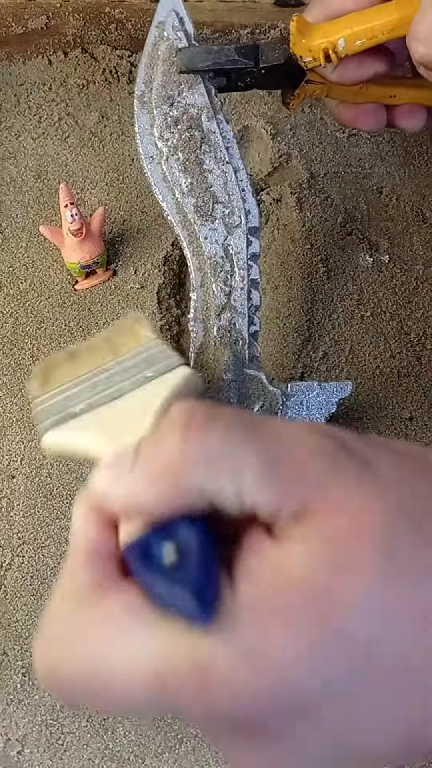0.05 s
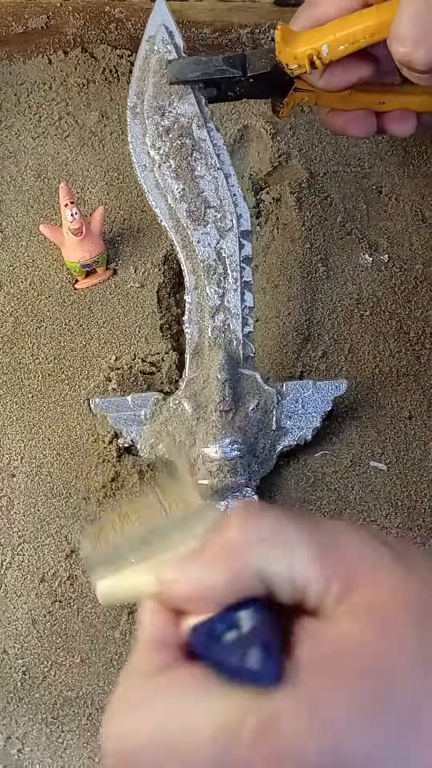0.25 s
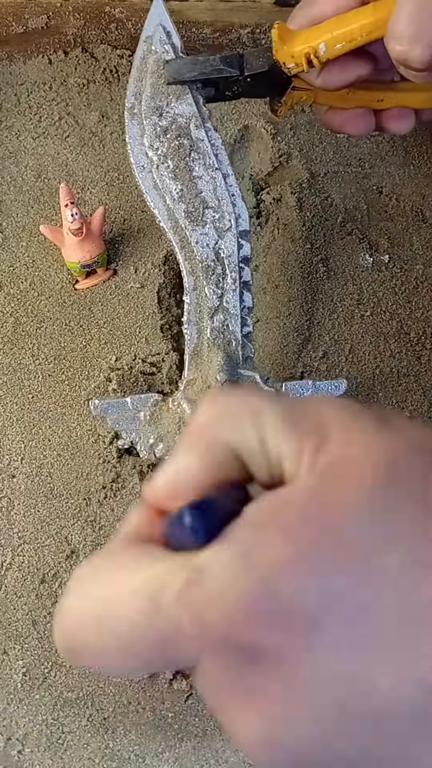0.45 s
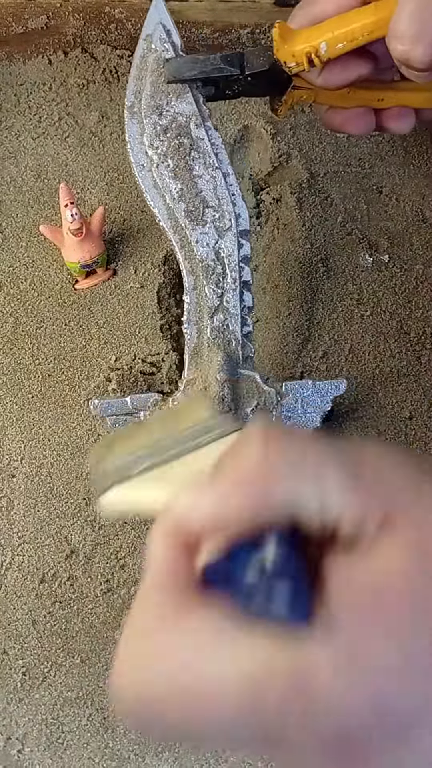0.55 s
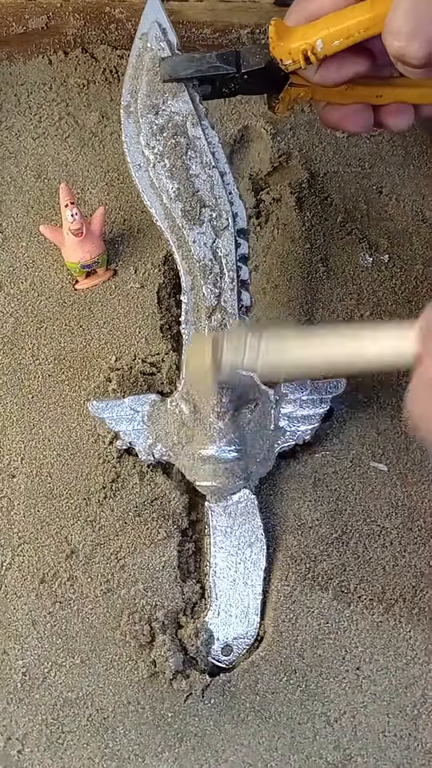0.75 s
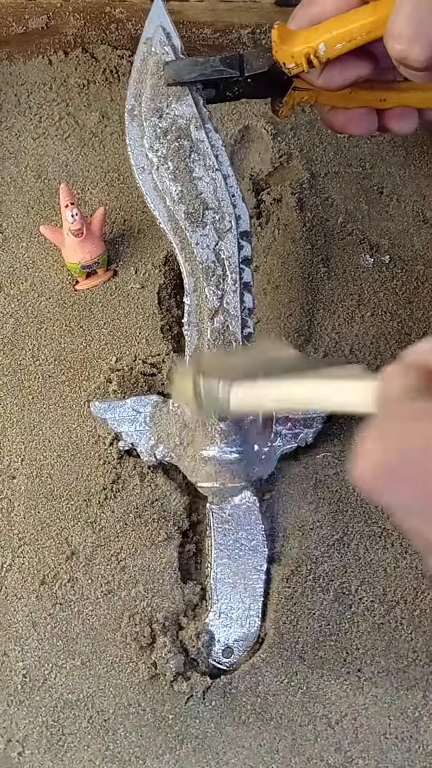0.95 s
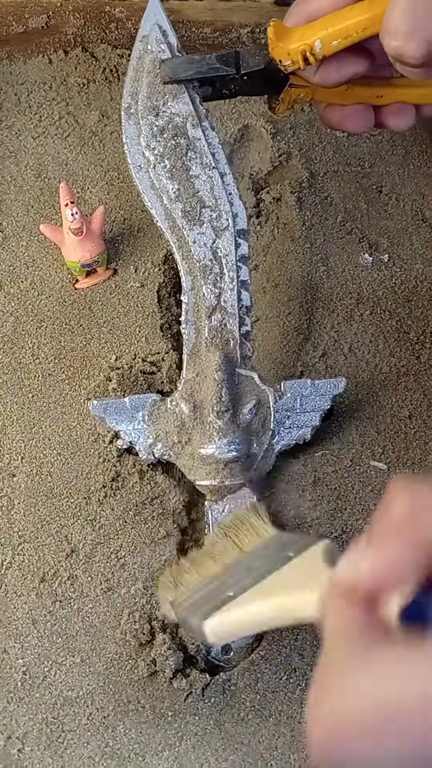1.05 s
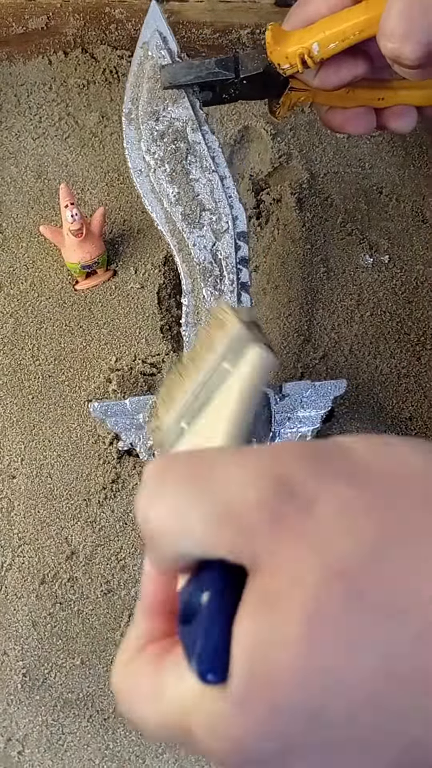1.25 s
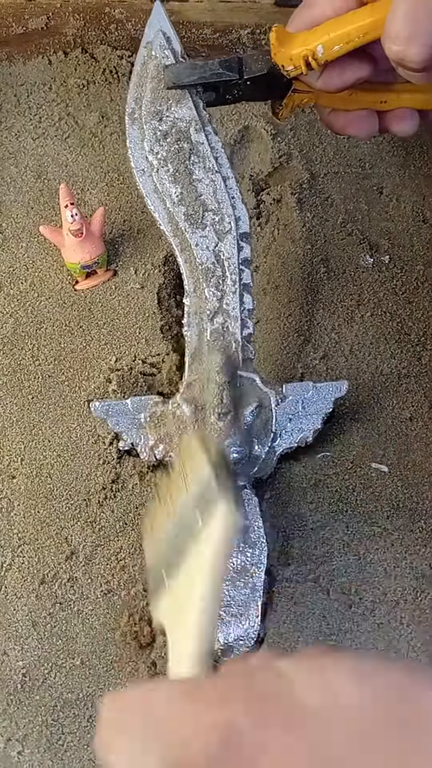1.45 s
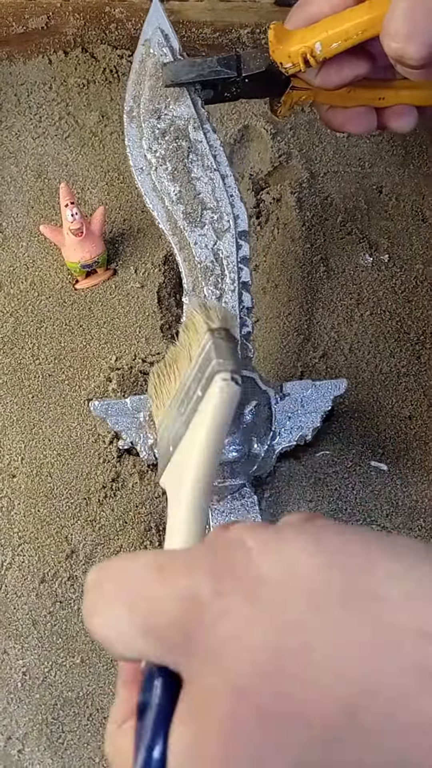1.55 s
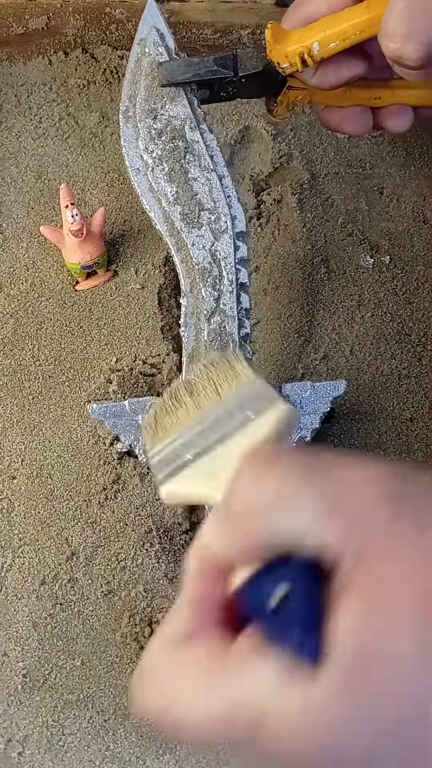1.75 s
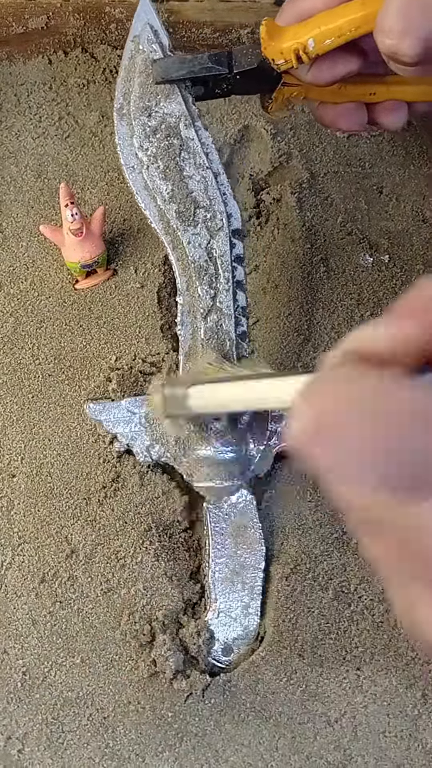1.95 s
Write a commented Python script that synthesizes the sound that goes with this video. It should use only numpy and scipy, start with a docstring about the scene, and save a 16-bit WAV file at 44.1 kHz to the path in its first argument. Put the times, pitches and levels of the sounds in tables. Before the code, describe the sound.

Quick, raspy brush strokes over sandy metal, twice knocking against it with a small clink.

```python
"""A paintbrush flicks sand off a cast metal sword lying in a bed of sand, close to one microphone.
The bristle tips touch with small chirps, then each stroke swells into a gritty rasp that deepens
as the bristles bend, and the bed thumps and shudders beneath. Twice the brush knocks on the metal
and ringing tones linger briefly. The place is a small, quiet room with a short tail."""
import sys
import numpy as np
from scipy import signal
from scipy.fft import rfft, irfft
from scipy.io import wavfile
from scipy.ndimage import uniform_filter1d

SR = 44100
rng = np.random.default_rng(int(sys.argv[2]) if len(sys.argv) > 2 else 0)


def generate_wav(signal):
    """Clip the signal to [-1, 1] and save it as 16-bit WAV at the path in sys.argv[1]."""
    frames = np.transpose(np.atleast_2d(signal))
    scaled = np.clip(frames, -1, 1) * 32767
    pcm = np.round(scaled).astype(np.int16)
    wavfile.write(sys.argv[1], SR, pcm)


N = 88200
TIME = np.arange(N) / SR

# ringing tones that linger after the knocks and faintly colour the brushing: pitch_hz, level_db, t60_s
LINGERING_TONES = [(281, -8, .16), (441, -4, .12), (938, 1, .09), (1091, 1, .11), (1303, -8, .09),
                   (1451, -6, .09), (1835, -1, .09), (1946, 1, .1), (2098, -3, .11), (2200, -4, .11),
                   (2340, 3, .09), (2543, 2, .11), (2719, 0, .11), (2860, 1, .09), (3435, -9, .08)]


def amp(db):
    """Decibels to gain."""
    return 10 ** (np.asarray(db) / 20)


def unit(x):
    """Scales to rms 1."""
    return x / np.sqrt(np.mean(x ** 2) + 1e-20)


def curve_at(points, hz):
    """Interpolates (freq_hz, value) points on a log-frequency axis."""
    freq_hz, value = np.transpose(points)
    return np.interp(np.log(hz + 1), np.log(freq_hz), value)


def colour(x, spectrum):
    """Filters x by (freq_hz, level_db) points, at rms 1."""
    gain = amp(curve_at(spectrum, np.fft.rfftfreq(N, 1 / SR)))
    return unit(irfft(rfft(x) * gain, N))


def add(mix, start_s, sound):
    """Mixes a sound in at start_s."""
    part = mix[max(round(start_s * SR), 0):][:len(sound)]
    part += sound[:len(part)]


def resonate(x, hz, width_hz):
    """A steep resonance that follows hz, at rms 1."""
    carrier = np.exp(2j * np.pi * np.cumsum(hz * np.ones(len(x))) / SR)
    pole = np.exp(-np.pi * width_hz / SR)
    baseband = signal.lfilter([1 - pole], [1, -2 * pole, pole * pole], x / carrier)
    return unit((carrier * baseband).real)


def ring(modes, t):
    """A sum of dying sines."""
    return sum(amp(db) * 1000 ** (-t / t60_s) * np.sin(2 * np.pi * hz * t) for hz, db, t60_s in modes)


def grit(grains_per_s=2200, spread_db=3, click_share=0.6):
    """Dense grain clicks of uneven size over smooth friction noise."""
    sizes = amp(spread_db * np.minimum(rng.exponential(1, N), 4))
    clicks = sizes * rng.choice([-1, 1], N) * (rng.random(N) < grains_per_s / SR)
    return np.sqrt(click_share) * unit(clicks) + np.sqrt(1 - click_share) * rng.standard_normal(N)


def room_tone(level_db=-92.5):
    """The faint, mostly low air of a quiet room."""
    # spectrum of the air: freq_hz, level_db
    spectrum = [(25, 5.5), (120, 17), (300, 5), (1000, -14.5), (2500, -24), (5000, -12.5), (10000, -40),
                (16000, -17.5)]
    return amp(level_db) * colour(rng.standard_normal(N), spectrum)


def room_tail(x, delay_s=0.008):
    """The small room answers with a diffuse tail, each band dying at its own speed."""
    # decay of the room: freq_hz, t60_s
    decay = [(150, 0.17), (1000, 0.19), (2500, 0.19), (5000, 0.15), (12000, 0.058)]
    hz, t, bands = signal.stft(rng.standard_normal(SR // 2), SR, nperseg=256)
    fade = amp(-60 * t / curve_at(decay, hz)[:, None])
    tail = signal.istft(bands * fade, SR, nperseg=256)[1]
    out = np.zeros(N)
    add(out, delay_s, signal.fftconvolve(x, tail / np.linalg.norm(tail)))
    return out


def near_echoes(x, count=8, span_s=0.022, level_db=-11):
    """The bench and the box walls throw a few early reflections back to the microphone."""
    out = np.zeros(N)
    for distance, polarity in rng.random((count, 2)):
        add(out, span_s * (0.15 + distance), np.sign(polarity - 0.5) * x)
    return amp(level_db) * out / np.sqrt(count)


def bed_rumble(brush, lag_s=0.032, relative_db=-22.5):
    """The bed shudders under the brush and settles a little later."""
    # spectrum of the shudder: freq_hz, level_db
    spectrum = [(25, -25), (60, 0.5), (100, 4), (200, -6.5), (260, -14.5), (420, -7.5), (700, -35)]
    pole = np.exp(-1 / (lag_s * SR))
    brush_rms = np.sqrt(signal.lfilter([1 - pole], [1, -pole], brush ** 2))
    return amp(relative_db) * brush_rms * colour(rng.standard_normal(N), spectrum)


def bed_thumps(rise_s=0.016, t60_s=0.088):
    """Each push gives a soft low thud and sets the sand box ringing."""
    # pushes of the brush on the bed: start_s, level_db, pitch_hz
    pushes = [(0.046, -65, 149), (0.073, -59, 146), (0.171, -51.5, 139), (.203, -50, 165),
              (0.227, -46.5, 140), (.358, -54.5, 108), (0.411, -55.5, 135), (0.571, -50.5, 114),
              (.590, -63, 136), (0.641, -59, 146), (.752, -58.5, 93), (0.814, -53, 150),
              (0.993, -49.5, 145), (1.157, -61, 88), (1.171, -57, 137), (1.284, -59.5, 121),
              (1.332, -67.5, 150), (1.379, -70, 150), (1.587, -57.5, 127), (1.616, -61, 147),
              (1.719, -61, 146), (1.767, -61.5, 151), (1.830, -83, 136), (1.918, -59.5, 101),
              (1.982, -63, 135)]
    # modes of the sand box: pitch_hz, level_db, t60_s
    box_modes = [(146.1, -10.5, .26), (234.7, -22, 0.16), (280.8, -19, .16), (414.4, -24.5, 0.17)]
    out, t = np.zeros(N), np.arange(SR // 3) / SR
    onset = np.sin(np.pi / 2 * np.minimum(t / rise_s, 1)) ** 2
    for start_s, db, hz in pushes:
        thud = ring([(hz, 0, t60_s)], t)
        add(out, start_s, 2 * amp(db) * onset * (thud + ring(box_modes, t)))
    return out


def brush_ringing(brush, relative_db=-16):
    """Ringing tones faintly colour the brushing."""
    tones = ring(LINGERING_TONES, np.arange(SR // 3) / SR)
    return amp(relative_db) * brush.std() * unit(signal.fftconvolve(brush, tones)[:N])


def crackle(bursts, rise_s):
    """Crushed grains give short, bright bursts."""
    # spectrum of cracking grains: freq_hz, level_db
    spectrum = [(1500, -8), (3300, 11), (4500, -3.5), (5400, 2), (7000, -1), (8500, -7.5), (10500, -23),
                (14000, -27), (15500, -20.5)]
    envelope, t = np.zeros(N), np.arange(SR // 8) / SR
    for start_s, db, t60_s in bursts:
        add(envelope, start_s, amp(db - 60 * t / t60_s) * (1 - np.exp(-t / rise_s)))
    return envelope * colour(grit(), spectrum)


def bristle_ticks():
    """Single bristles and coarse grains tick."""
    # ticks: start_s, level_db, t60_s
    ticks = [(.040, -70.5, 0.069), (.168, -65.5, 0.057), (.732, -60.5, 0.068), (.763, -49, .025),
             (.864, -68.5, 0.034), (.923, -67, 0.14), (1.041, -78, 0.039), (1.083, -77, 0.075),
             (1.204, -61.5, .02), (1.509, -48, 0.021), (1.714, -56.5, 0.049), (1.919, -63.5, 0.065)]
    return crackle(ticks, rise_s=0.005)


def knocks(band_hz=(204, 3530), clink_rise_s=0.00078, tones_rise_s=0.003, crack_t60_s=0.019):
    """The brush hits the sword, grains crack, and tones linger after each clatter's hardest contact."""
    # the handle clatters on the sword: start_s, thock_db, clink_db, crack_db
    handle_hits = [(0.1993, -48.5, -31, -64), (0.2067, -22, -39, -47), (0.2082, -28.5, -21.5, -52.5),
                   (0.2131, -43.5, -21.5, -56.5)]
    # later the brush's metal band skips over the sandy guard: start_s, ring_db, crack_db
    band_skips = [(1.1582, -48, -48.5), (1.1611, -44.5, -45), (1.1629, -32.5, -45.5), (1.1642, -36, -44.5),
                  (1.1692, -48, -52)]
    # modes of the dull thock: pitch_hz, level_db, t60_s
    thock_modes = [(462, -5.5, 0.014), (1004, -6.5, 0.018), (1082, -4.5, 0.02), (1674, -7.5, 0.0065),
                   (1825, -2, 0.038)]
    # modes of the metal clink: pitch_hz, level_db, t60_s
    clink_modes = [(2070, -4, 0.017), (2416, 2.5, 0.013), (2586, -1, .012), (2703, -2.5, 0.01),
                   (3270, -6.5, 0.013)]
    # modes of the brush's metal band: pitch_hz, level_db, t60_s
    band_modes = [(656, -30, 0.022), (820, -15, 0.02), (900, -11.5, 0.031), (1452, -20, 0.043),
                  (1590, -18, 0.035), (1944, 1.5, 0.09), (2170, -22, 0.0087), (3425, -8, 0.044),
                  (4020, -13.5, 0.027)]
    body, t = np.zeros(N), np.arange(SR // 3) / SR
    clink = ring(clink_modes, t) * (1 - np.exp(-t / clink_rise_s))
    for start_s, thock_db, clink_db, _ in handle_hits:
        add(body, start_s, -amp(thock_db) * ring(thock_modes, t) - amp(clink_db) * clink)
    for start_s, ring_db, _ in band_skips:
        add(body, start_s, amp(ring_db) * ring(band_modes, t))
    tones = ring(LINGERING_TONES, t) * (1 - np.exp(-t / tones_rise_s))
    for contacts, tones_db in ((handle_hits, -43), (band_skips, -57)):
        hardest_s = max(contacts, key=lambda row: row[1])[0]
        add(body, hardest_s, amp(tones_db) * tones)
    cracks = [(start_s, crack_db, crack_t60_s) for start_s, *_, crack_db in handle_hits + band_skips]
    contact_band = signal.butter(3, band_hz, "bandpass", fs=SR, output="sos")
    return crackle(cracks, rise_s=0.0005) + signal.sosfilt(contact_band, body)


def tip_touches():
    """The bristle tips catch and slip together in short, narrow chirps."""
    # chirps on the metal, low grunts in the sand: centre_s, length_s, pitch_hz, width_hz, level_db
    chirps = [ (.050, 0.0067, 2580, 901, -92), (.092, 0.032, 382, 100.5, -75),
              (0.179, 0.017, 2400, 860, -61.5), (.362, 0.021, 2340, 700, -67.5),
              (.537, 0.0071, 2280, 700, -71), (0.646, 0.025, 2110, 250, -55),
              (0.676, 0.023, 1950, 396, -74.5), (0.741, 0.0097, 2540, 905, -53.5),
              (0.741, 0.0083, 433, 170, -59.5), (0.821, 0.021, 300, 109, -64),
              (.475, 0.013, 420, 120, -72.5), (.605, 0.038, 390, 130, -73.5),
              (0.934, 0.0092, 2350, 570, -52.5), (.957, 0.017, 2200, 800, -59),
              (1.14, 0.012, 2480, 596, -65), (1.264, 0.022, 650, 249, -61.5),
              (1.228, 0.023, 2120, 500, -63.5), (1.299, 0.041, 2360, 446, -59),
              (1.441, 0.019, 1900, 249, -69.5), (1.649, 0.0076, 1800, 408, -68.5),
              (1.718, 0.0049, 2630, 930, -50), (1.724, 0.0043, 2640, 695, -49.5),
              (1.716, 0.012, 533, 200, -71.5), (1.786, 0.013, 2700, 252, -55),
              (1.825, 0.0053, 2330, 905, -51), (1.873, 0.025, 2270, 690, -64.5),
              (1.926, 0.014, 2560, 646, -62.5)]
    # faint high whispers between strokes: centre_s, length_s, pitch_hz, width_hz, level_db
    whispers = [(.325, 0.086, 4430, 400, -80), (1.095, 0.046, 7100, 1500, -89),
                (1.672, 0.079, 4450, 400, -77.5)]
    out, t = np.zeros(N), np.arange(SR // 5) / SR
    middle_s = t.mean()
    for centre_s, length_s, hz, width_hz, db in chirps + whispers:
        swell = np.exp(-2 * ((t - middle_s) / length_s) ** 2)
        chirp = resonate(rng.standard_normal(len(t)), hz, width_hz) * swell
        add(out, centre_s - middle_s, amp(db) * unit(chirp) * np.sqrt(np.mean(swell ** 2)))
    return out


def grain_clumps(x, depth_db=2.9):
    """Clumps of grains lift and dip narrow bands for a moment."""
    bands = signal.stft(x, nperseg=512)[2]
    patches = uniform_filter1d(rng.standard_normal(bands.shape), size=4, axis=0)
    patches = uniform_filter1d(patches, size=4, axis=1)
    return signal.istft(bands * amp(depth_db * unit(patches)), nperseg=512)[1][:N]


def brush_strokes(ramp_db=27, ramp_curve=0.95, flutter_db=0.27):
    """Bristles drag grains over the metal, close up; the scrub sinks in pitch as they bend."""
    # strokes: full_pressure_s, rise_s, hold_s, fall_s, scrub_db, rasp_db, hiss_db
    strokes = [ (0.058, 0.02, 0.022, 0.049, -68.5, -66, -70.5),
               (.195, 0.0072, 0.016, 0.061, -48.5, -54, -54),
               (0.227, 0.017, 0.031, 0.032, -58.5, -56.5, -78.5),
               (0.393, 0.056, 0.035, 0.038, -62.5, -57.5, -63),
               (0.465, 0.021, 0.0083, 0.087, -71.5, -78, -83),
               (0.492, .008, 0.0044, 0.014, -86, -68.5, -71.5),
               (0.533, 0.013, 0.0038, 0.045, -72, -61.5, -69), (0.569, .03, 0.033, 0.057, -76, -64.5, -67),
               (0.628, 0.017, 0.028, 0.034, -64, -63, -61.5), (0.767, 0.033, 0.052, 0.042, -62, -58, -62.5),
               (.970, 0.032, 0.016, 0.024, -59, -54.5, -59.5), (0.998, .012, 0.007, .02, -59, -61, -64),
               (1.041, 0.0116, 0.012, 0.064, -68, -85, -79.5),
               (1.151, 0.059, 0.021, 0.026, -67.5, -66, -65.5),
               (1.185, .02, 0.037, 0.062, -87.5, -72, -68.5),
               (1.249, 0.032, 0.014, 0.049, -65, -58.5, -61.5),
               (1.283, 0.026, 0.054, 0.044, -82, -61.5, -60), (1.347, 0.02, 0.04, 0.038, -65, -59.5, -64),
               (1.439, 0.023, 0.0074, 0.024, -77.5, -82, -70),
               (1.486, 0.02, 0.027, .012, -83.5, -70, -69.5), (1.568, 0.034, 0.013, 0.1, -67.5, -57, -57.5),
               (1.59, .03, 0.015, 0.059, -60.5, -61, -73), (1.758, 0.048, 0.0082, 0.049, -58, -54.5, -58),
               (1.789, 0.027, .01, 0.02, -63, -63, -67), (1.822, 0.019, 0.014, 0.047, -55, -54, -67),
               (1.967, 0.038, 0.022, .04, -60.5, -55.5, -59.5)]
    # spectrum of the low scrub: freq_hz, level_db
    scrub_spectrum = [(60, -17.5), (160, -3.5), (280, -3.5), (500, -1), (900, -2), (1400, 4.5),
                      (1900, -2.5), (3000, -53)]
    # spectrum of the midrange rasp: freq_hz, level_db
    rasp_spectrum = [(800, -41.5), (1400, -20.5), (1900, 1.5), (2300, 1), (2800, 5.5), (3100, -5),
                     (3500, -3), (4300, -17.5), (7000, -40.5)]
    # spectrum of the high hiss: freq_hz, level_db
    hiss_spectrum = [(1800, -24), (3300, 5), (4000, 2), (4800, -0.5), (6400, -1), (8000, -9.5),
                     (10500, -17), (14000, -27.5), (15300, -11), (16000, -14.5)]
    straight_hz, bent_hz, bend_s, bend_share = 1720, 670, 0.0081, 0.46
    fall_speed = np.array([1, 1, 1.39])[:, None]  # the hiss dies fastest as the bristles lift
    power, bent_power, scrub_power = np.zeros((3, N)), np.zeros(N), np.full(N, 1e-30)
    for full_s, rise_s, hold_s, fall_s, *levels_db in strokes:
        before = np.maximum((full_s - TIME) / rise_s, 0)
        after = fall_speed * np.maximum((TIME - full_s - hold_s) / fall_s, 0)
        pressure = amp(-ramp_db * np.minimum(before + after, 10) ** ramp_curve)
        stroke_power = (amp(levels_db)[:, None] * pressure) ** 2
        bend = (1 + np.tanh((TIME - full_s - hold_s / 2) / bend_s)) / 2
        power += stroke_power
        bent_power += stroke_power[0] * bend
        scrub_power += stroke_power[0]
    # where strokes overlap, the loudest scrub leads the pitch
    pitch_hz = straight_hz * (bent_hz / straight_hz) ** (bent_power / scrub_power)
    scrub = np.sqrt(1 - bend_share) * colour(grit(), scrub_spectrum)
    scrub += np.sqrt(bend_share) * resonate(grit(), pitch_hz, width_hz=1020)
    flutter = amp(flutter_db * unit(uniform_filter1d(rng.standard_normal(N), size=220)))
    rasp, hiss = colour(grit(), rasp_spectrum), colour(grit(), hiss_spectrum)
    return flutter * (np.sqrt(power) * [scrub, rasp, hiss]).sum(0)


def scene(brush_send_db=-22, knock_send_db=-16.5):
    """Brush, knocks and bed close to one microphone, with the room well behind them."""
    brush = grain_clumps(brush_strokes()) + tip_touches() + bristle_ticks()
    hits = knocks()
    brush = brush + near_echoes(brush) + brush_ringing(brush)
    tail = room_tail(amp(brush_send_db) * brush + amp(knock_send_db) * hits)
    air = room_tone()
    return (brush + hits + bed_thumps() + bed_rumble(brush) + tail + air)[None]


def record(dry, cutoff_hz=15900):
    """The recorder's band limit cuts the highest treble."""
    lowpass = signal.firwin(511, cutoff_hz, window=("kaiser", 9), fs=SR)
    return signal.oaconvolve(dry, lowpass[None], "same")


dry = scene()
out = record(dry)
generate_wav(out)
```